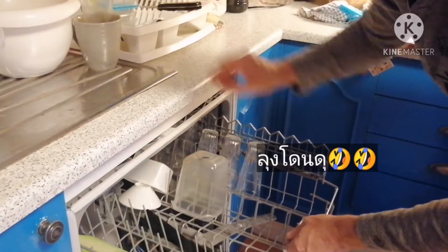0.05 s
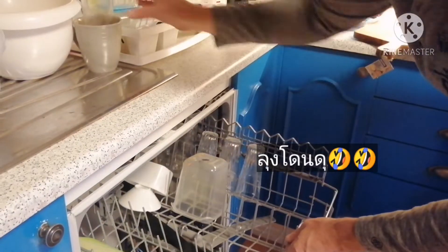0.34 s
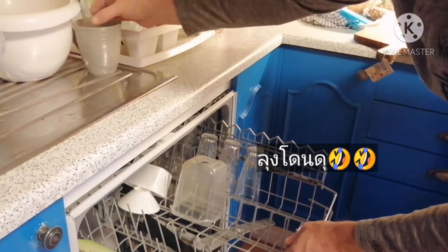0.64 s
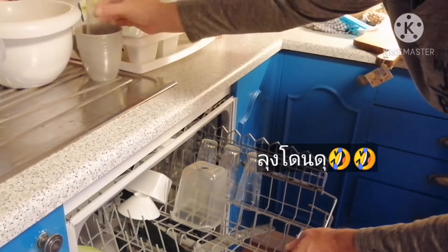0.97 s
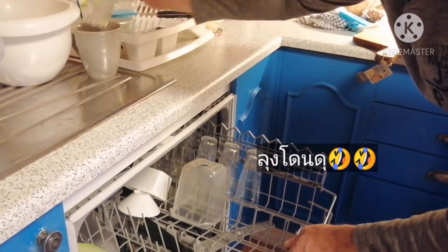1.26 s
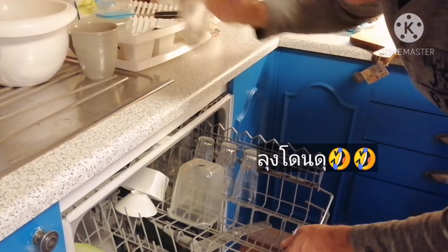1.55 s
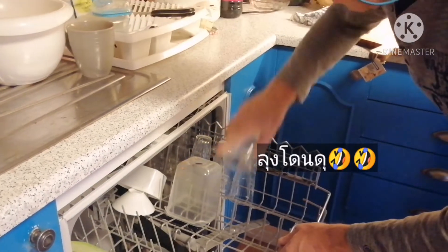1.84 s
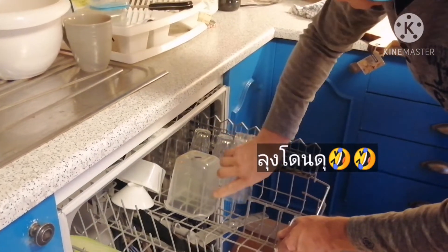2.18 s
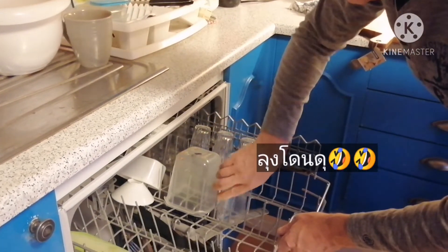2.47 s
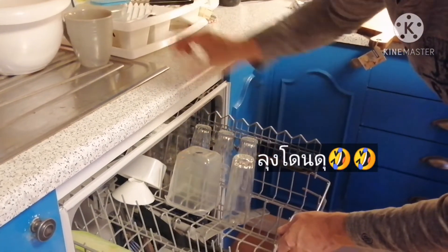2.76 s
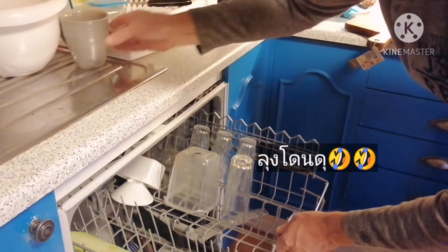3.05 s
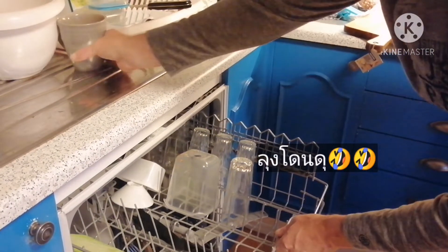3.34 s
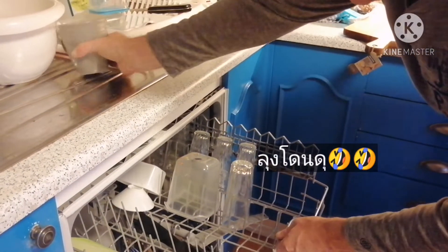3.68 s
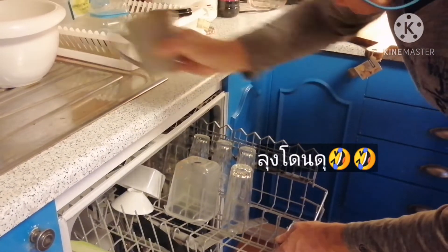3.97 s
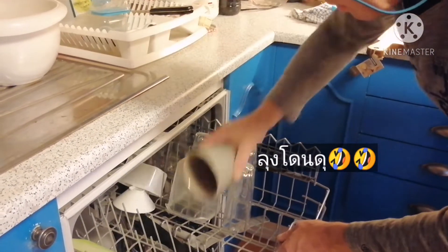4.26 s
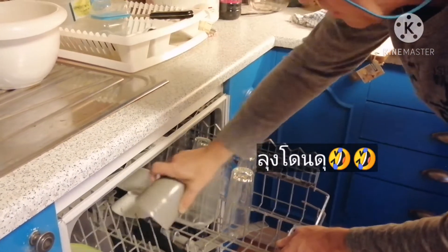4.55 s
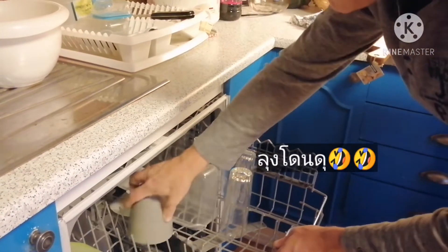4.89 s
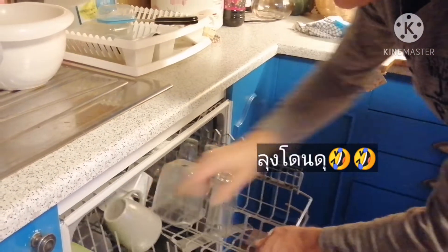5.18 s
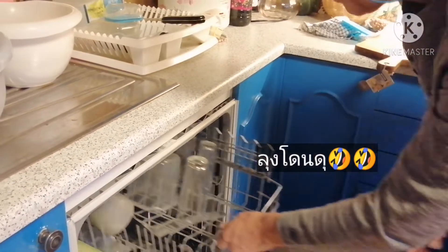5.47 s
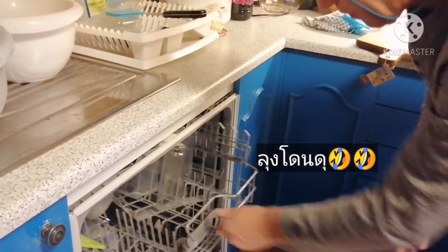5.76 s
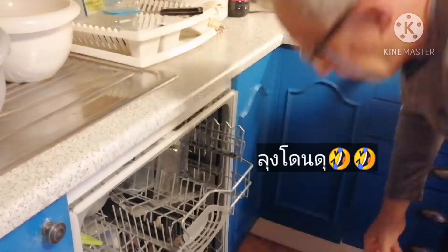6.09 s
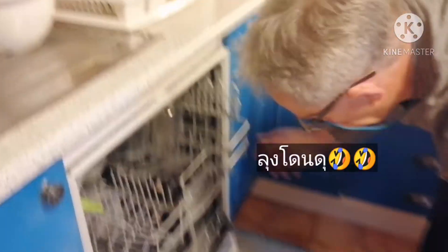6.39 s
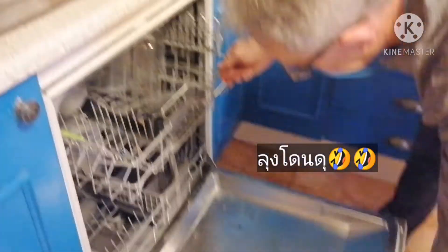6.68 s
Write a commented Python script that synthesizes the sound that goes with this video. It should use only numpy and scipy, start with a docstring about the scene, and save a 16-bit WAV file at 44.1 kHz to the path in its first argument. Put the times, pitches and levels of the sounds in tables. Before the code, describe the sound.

A faint hum fills a small, hard-walled kitchen, and a wire rack gives a slight rattle at the start. Around 1 second a china mug is knocked and rocks, chiming clearly over the low boom of a steel draining board. From 2.3 to 3 seconds drinking glasses clink together and the dishwasher rack rattles. At 3.1 seconds the mug thuds on the board, with softer knocks and light drags until about 3.9. Between 4.7 and 5.3 seconds it clinks into the rack, rubbing against the tines with two brief groans and a tiny squeal. From 5.4 seconds the rack rolls in with three quick clicks, a low rumble, scraping runners and softly shivering glasses, and it clacks against its stop near 5.9. A few faint bumps and tinks follow, and the door clunks at about 6.8. Everything sounds close, with short room echoes.

```python
"""A dishwasher is loaded in a small kitchen. A china mug is knocked and rocks, chiming, on the booming
steel draining board. A tumbler clinks in among the glasses in the wire rack. The mug is dragged off the
board and wedged in beside them, groaning and squealing against the tines. The rack rolls home on scraping
runners, glasses shivering, and hits its stop; last, the door clunks as it is lifted. Hard walls and
cupboards answer the blows, over a faint hum."""
import sys
import numpy as np
from scipy import signal
from scipy.fft import rfft, irfft
from scipy.io import wavfile

SR = 44100
rng = np.random.default_rng(int(sys.argv[2]) if len(sys.argv) > 2 else 0)


def pcm_store(signal):
    """Save signal as 16-bit PCM."""
    levels = np.round(np.clip(np.atleast_2d(signal), -1, 1) * 32767)
    wavfile.write(sys.argv[1], SR, levels.astype(np.int16).T)


N = 301236
T = np.arange(N) / SR
FREQS = np.fft.rfftfreq(N, 1 / SR)


def mug(rim_crack_db=-10, foot_crack_db=0):
    """China chimes when struck at the rim and cracks at the foot; it rings out only when it stands free."""
    # clear modes: f/Hz, t60/s, level/dB struck at the rim, on the wall, at the foot
    modes = [(964, 1.2, -32, -34, -28), (2184, .62, 1, 2.5, -4.5), (2320, .66, -18, -14, 4),
             (900, .09, -16, -11, -19), (1180, .08, -8, -26.5, -20), (2225, .15, -10, -14, -1),
             (2440, .15, -24, -25.5, 0), (2590, .12, -29.5, -23, 0), (2883, .16, -20, -11, -11),
             (2975, .13, -17, -15, -5), (3780, .18, -18, -16, -15), (4797, .38, -24, -11, -17),
             (5610, .1, -24, -25, 1), (5695, .16, -33, -34, -2), (6480, .17, -4, -12.5, -17.5),
             (6400, .14, -9, -25.5, -21.5), (8160, .1, -15, -21, -26), (10650, .1, -17, -18, -22.5),
             (11760, .11, -24, -22, -26.5)]
    # the clink's noisy crack: f/Hz, level/dB
    crack = [(100, -22), (450, -20), (850, 9), (1400, -10.5), (1900, 1), (2600, 4.5), (3700, 2.5),
             (4800, -10), (6600, -7), (9000, -18), (11900, -10.5), (13200, -50.5)]
    # blows: t/s, level/dB, brightness/(dB per octave), place (0 rim, 1 foot), contact damping/(1/s)
    hits = [(.982, -11.5, -1, 0.54, 30.5), (1.027, -20, 4.5, 0.85, 21.5), (1.068, -26.5, 0, 1, 29),
            (1.078, -23.5, -1, 1, 28), (1.104, -23, -1.5, .95, 0), (1.152, -36, 0.5, 0.37, 12.5),
            (3.125, -43, 9, .9, 30), (4.682, -25.5, 3, .018, 33), (4.779, -27, 2, 0.92, 44),
            (5.052, -38, -7, 0.83, 35), (5.199, -28.5, 8, 0.89, 24), (5.207, -26, -4, 0.85, 26)]
    out = np.zeros(N)
    for s, db, bright_db, place, damping in hits:
        ring = vessel(modes, place, damping)
        crack_db = db + between(rim_crack_db, foot_crack_db, place)
        add(out, s, blow(ring, crack, db, crack_db, bright_db, pivot_hz=2800, crack_t60=0.034))
    return out


def glass_tap(db, place, semitones):
    """One tumbler meets another: a short tink at the rim, brighter and longer at the foot."""
    # clear modes: f/Hz, t60/s, level/dB struck at the rim, at the foot
    modes = [(1476, .28, -22, -46), (1897, 0.077, -33, -11.5), (2803, 0.075, -2, -18.5),
             (2913, 0.15, 3.5, -8), (2984, 0.1, 1.5, -14), (3060, 0.074, -12.5, -26),
             (3533, 0.17, -23, -16.5), (5840, 0.14, -16, -9.5), (6460, 0.26, -25.5, -1),
             (6560, .16, -26, -4), (10230, 0.12, -35, 2), (10840, .11, -16.5, -14), (11300, 0.14, -35.5, 0),
             (11900, .15, -47, 1.5)]
    # the clink's noisy crack: f/Hz, level/dB
    crack = [(100, -25), (500, -5), (1900, -7.5), (3000, -3), (4300, -12), (6550, 3), (8400, -9),
             (12200, 2), (13300, -38.5)]
    damping = between(48, 3, place)  # 1/s: fingers choke the rim, wires barely damp the foot
    ring = vessel(modes, place, damping, semitones)
    crack_db = db + between(-15, 0, place)
    bright_db = between(-5, -1.5, place)
    return blow(ring, crack, db, crack_db, bright_db, pivot_hz=2800, crack_t60=.07)


def tumblers():
    """Nearly alike glasses clink together, each at a slightly different pitch."""
    # taps: t/s, level/dB, place (0 rim, 1 foot), detune/semitones
    hits = [(2.334, -37, 0, 0), (2.509, -30, 0.11, 0.11), (2.578, -20.5, 0.52, -0.01),
            (2.654, -20.5, 0.8, 0.07), (2.831, -34, 0.81, -0.14), (2.855, -28, 0.63, 0.12),
            (2.866, -26, 0.72, 0.39), (2.96, -29, 0.33, .7), (5.337, -36, 0.47, 0.53),
            (6.045, -70, .08, 0.85), (6.316, -50.5, 0.52, 0.76), (6.426, -54, 0.42, 0.73)]
    out = np.zeros(N)
    for s, db, place, semitones in hits:
        add(out, s, glass_tap(db, place, semitones))
    return out


def draining_board(edge_boom_db=-9, middle_boom_db=4):
    """The mug knocks on the steel sheet, which booms most in the middle, and is dragged off in two pulls."""
    # modes of the steel sheet, plus the high ring of the mug knocking on it: f/Hz, t60/s, level/dB
    modes = [(71.07, 0.17, -11.5), (123.9, 0.17, -4), (141.6, .14, 4.5), (190.2, 0.13, -9.5),
             (253, 0.053, -11.5), (720, 0.044, -13.5), (814, 0.11, -6.5), (2745, .04, -13),
             (4850, .3, -25.5)]
    # the knock's noisy crack: f/Hz, level/dB
    crack = [(45, -25.5), (130, 2.5), (300, -1), (900, -5), (1500, -9), (2600, -2), (4300, -18.5),
             (7000, -26), (12000, -32.5), (15000, -50)]
    # knocks: t/s, level/dB, brightness/(dB per octave), place (0 edge, 1 middle)
    hits = [(0.822, -36, -5, 0.42), (0.875, -36, -0.5, 0.16), (1.005, -25.5, -5, 0.52),
            (1.051, -27, 1.5, 0.12), (1.098, -27.5, -2, 0.63), (1.179, -25, 0, 0.33),
            (3.125, -17.5, 0, 0.56), (3.371, -27, 1, 0.26), (3.384, -31, 0, 0.28),
            (3.662, -33.5, -5.5, 0.7), (3.706, -41, -9, 0.93), (3.905, -42.5, -2, 0)]
    # pulls: t/s, length/s, level/dB
    pulls = [(3.595, 0.087, -48.5), (3.73, 0.037, -42.5)]
    # china dragging on steel: f/Hz, level/dB
    drag_colour = [(200, -41), (800, 8.5), (1500, 6.5), (3700, 4.5), (5000, -1), (12000, -9.5),
                   (15000, -24)]
    boom_db = [between(edge_boom_db, middle_boom_db, hit[-1]) for hit in hits]
    thuds = knocks([hit[:-1] for hit in hits], modes, crack, crack_t60=0.09, ring_db=boom_db)
    return thuds + rub(pulls, drag_colour, slips_per_s=2500, spread_db=4.0)


def wire_rack():
    """The loaded rack rattles when jolted; the mug rubs in between its tines, then slips home."""
    # modes of the loaded rack: f/Hz, t60/s, level/dB
    modes = [(235.3, 2.5, -14), (315.3, 0.51, 1), (523, 0.27, -1.5), (663, 0.12, 3), (788, 0.18, 0)]
    # the jolt's noisy crack: f/Hz, level/dB
    crack = [(40, 1), (130, 12.5), (550, 16.5), (1200, 2), (2500, 1.5), (4200, -14), (6000, -19),
             (8500, -35), (12000, -38), (15000, -84)]
    # jolts: t/s, level/dB, brightness/(dB per octave)
    jolts = [(.002, -37.5, 1.5), (2.569, -32.5, 8.5), (2.579, -20.5, 6), (2.612, -21, 4.5),
             (4.761, -38.5, 2.5), (4.781, -33, 2.5), (4.942, -35.5, 5.5), (5.021, -31.5, 7.5),
             (5.056, -29, 7), (5.208, -23, 3.5)]
    # pushes on the mug: t/s, length/s, level/dB
    pushes = [(4.765, 0.388, -45.5), (5.2, 0.074, -42)]
    # china rubbing on tines: f/Hz, level/dB
    wedge_colour = [(35, -44), (60, 0), (302, 1), (418, -0.5), (564, -17), (663, 1.5), (875, -5),
                    (2150, -9.5), (4730, -11), (5680, -10), (15000, -32)]
    rattle = knocks(jolts, modes, crack, crack_t60=0.045, ring_db=-15.5)
    return rattle + rub(pushes, wedge_colour, slips_per_s=220, spread_db=2.5)


def tine_groans(jitter=0.095, overtone_db=-9):
    """A tine sticks and slips on the china: brief groans, gliding and unsteady in pitch."""
    # groans: t/s, length/s, starting slip rate/Hz, final slip rate/Hz, level/dB
    groans = [(4.889, 0.054, 360, 450, -36.5), (4.941, 0.065, 700, 670, -39.5)]
    out = np.zeros(N)
    for s, length, start_hz, end_hz, db in groans:
        size = int(length * SR)
        hz = np.linspace(start_hz, end_hz, size) * (1 + jitter * walk(273)[:size])
        phase = 2 * np.pi * np.cumsum(hz) / SR
        tone = np.sin(phase) + undb(overtone_db) * np.sin(2 * phase)
        add(out, s, undb(db) * np.hanning(size) * tone)
    return out


def mug_squeal():
    """Sliding down a tine keeps one high mode of the china singing."""
    # slide: t/s, length/s, level/dB
    slide = [(5.15, .05, -48.5)]
    return sing(rng.standard_normal(N), resonance(hz=5600, width_hz=40)) * strokes(slide)


def tub_and_door():
    """Bumps make the tub boom; the lifted door shares its body but mostly clunks."""
    # modes of tub and door: f/Hz, t60/s, level/dB
    modes = [(79.3, 0.33, -11.5), (137, 0.027, 9), (189.4, 0.094, -6), (226, 0.11, -11), (293, 0.15, -11)]
    # the bump's noisy crack: f/Hz, level/dB
    crack = [(40, -32.5), (120, -3.5), (300, 5.5), (600, -6), (1500, -12.5), (2800, -6.5), (4500, -38),
             (14000, -60)]
    # bumps on the tub: t/s, level/dB
    bumps = [(2.597, -38.5), (5.626, -48.5), (5.871, -40.5), (6.58, -52.5), (6.674, -53)]
    # door clunks: t/s, level/dB, brightness/(dB per octave)
    clunks = [(6.777, -36.5, -8), (6.794, -35.5, -7.5), (6.817, -30.5, 0.5)]
    dull_bumps = [(s, db, -1.0) for s, db in bumps]
    booms = knocks(dull_bumps, modes, crack, crack_t60=0.053, ring_db=13.5)
    return booms + knocks(clunks, modes, crack, crack_t60=0.11, ring_db=-17.5)


def rolling(chatter_db=-4):
    """The wheels rumble on their runners; the first shove shakes the loose wires."""
    # a shove, then a longer push: t/s, length/s, level/dB
    pushes = [(5.37, 0.12, -45), (5.53, 0.288, -49.5)]
    # wheel rumble: f/Hz, level/dB
    rumble_colour = [(25, -3), (70, -0.5), (140, -0.5), (300, -6.5), (600, -18.5), (2500, -30), (5000, -37),
                     (15000, -63)]
    # wire chatter: f/Hz, level/dB
    chatter_colour = [(300, 3.5), (1000, 3), (1600, 5.5), (2900, 2), (4300, -4), (6000, -33), (14000, -51)]
    wheels = rub(pushes, rumble_colour, slips_per_s=790, spread_db=3.5)
    wires = rub(pushes[:1], chatter_colour, slips_per_s=134, spread_db=4.5)
    return wheels + undb(chatter_db) * wires


def end_stop():
    """The rack hits its end stop with a clack."""
    # spectrum of the clack: f/Hz, level/dB
    spectrum = [(60, 4.5), (250, 12.5), (600, -11.5), (1200, 1), (1800, -7), (2600, 6.5), (3400, -2),
                (4500, -19), (12000, -45)]
    return clack(spectrum, s=5.863, db=-33, t60=0.071)


def wheel_clicks():
    """One sharp, dry pulse for each runner joint that a wheel crosses."""
    # joints: t/s, peak level/dB
    joints = [(5.383, -31), (5.419, -30), (5.437, -27.5)]
    # spectrum of a click: f/Hz, level/dB
    spectrum = [(60, -18), (300, 15), (1500, -1), (4400, -4), (5200, -22), (14000, -44)]
    pulse = colour(signal.unit_impulse(SR), spectrum)
    out = np.zeros(N)
    for s, db in joints:
        add(out, s, undb(db) * pulse / np.abs(pulse).max())
    return out


def glass_shiver(place=0.4, spread_db=3):
    """The rolling rack sets off many tiny, random taps among the glasses."""
    # spell of shivering: t/s, length/s, tap rate/(1/s), level/dB
    spells = [(5.39, .45, 50, -58.5)]
    # one per tumbler: detune/semitones
    detunes = [-0.64, 0.594, .9]
    out = np.zeros(N)
    for semitones in detunes:
        chance = rng.random(N)
        sizes = undb(spread_db * rng.standard_normal(N))
        touches = np.zeros(N)
        for s, length, rate, db in spells:
            moving = (T > s) & (T < s + length)
            touches += undb(db) * moving * (chance < rate / SR / len(detunes))
        out += signal.fftconvolve(touches * sizes, glass_tap(0, place, semitones))[:N]
    return out


def runners(uneven_db=2):
    """Metal scrapes unevenly on metal and sings in the runners as the rack goes in."""
    # runner resonances: f/Hz, width/Hz, level/dB
    modes = [(2500, 260, 0.5), (2980, 200, 0), (3800, 420, -9), (9040, 1200, -12.5)]
    # scrapes: t/s, length/s, level/dB
    scrapes = [(5.57, 0.14, -77), (5.7, 0.16, -61.5)]
    body = sum(undb(db) * resonance(hz, width_hz) for hz, width_hz, db in modes)
    return sing(rng.standard_normal(N), body) * undb(uneven_db * walk(66)) * strokes(scrapes)


def ticks():
    """Small, dry ticks close by."""
    # ticks: t/s, level/dB, t60/s
    events = [(2.522, -49, 0.21), (4.359, -50, 0.073)]
    # spectrum of a tick: f/Hz, level/dB
    spectrum = [(400, -22), (950, 12.5), (1700, -34), (2900, 5), (4000, -16), (5200, -19), (8000, -43)]
    return sum(clack(spectrum, s, db, t60) for s, db, t60 in events)


def room_tone(air_db=-63, drift_db=0.77):
    """A soft bed of kitchen air with a low and a high wavering hum."""
    # spectrum of the air: f/Hz, level/dB
    air = [(15, -33), (25, -9), (59, -4.5), (118, -15), (231, -6), (278, -19), (318, 0), (383, -15.5),
           (427, -11), (475, -15.5), (2070, -29.5), (3010, -29.5), (3730, -33), (15000, -48)]
    # hums: f/Hz, width/Hz, level/dB
    hums = [(345.2, 18, -69.5), (3010, 38, -81)]
    out = undb(air_db + drift_db * walk(0.43)) * unit(colour(diffuse(N), air))
    for hz, width_hz, db in hums:
        out += undb(db) * sing(diffuse(N), resonance(hz, width_hz))
    return out


def kitchen(dry, near_db, far_db, far_t60, treble_t60, near_t60=.14, treble_hz=4000):
    """Direct sound, quick echoes from worktop and cupboards, then the room's tail, shorter in the treble."""
    t = T[:SR]
    near = undb(near_db) * diffuse(SR) / np.sqrt(SR) * fade(t, near_t60) * np.minimum(t / 0.00098, 1)
    near[:, 0] += 1  # the direct sound
    # flatten the quick echoes: they smear a sound in time but favour no pitch
    for _ in range(4):
        paths = rfft(near)
        near = irfft(paths / np.abs(paths) ** .5, SR) * np.exp(-(t / near_t60) ** 4)
    noise = diffuse(SR) / np.sqrt(SR)
    low = signal.sosfilt(signal.butter(2, treble_hz, fs=SR, output="sos"), noise)
    high = signal.sosfilt(signal.butter(2, treble_hz, "high", fs=SR, output="sos"), noise)
    tail = (low * fade(t, far_t60) - high * fade(t, treble_t60)) * np.minimum(t / 0.018, 1)
    response = near + undb(far_db) * tail
    response /= np.sqrt(np.mean(np.sum(response ** 2, axis=1)))
    return signal.fftconvolve(dry[None], response, axes=1)[:, :N]


def vessel(modes, place, damping, semitones=0):
    """A vessel's modes change in level from rim to foot; contact shortens them and pulls them off pitch."""
    hz, t60, *levels = np.transpose(modes)
    db = [np.interp(place, np.linspace(0, 1, len(row)), row) for row in np.transpose(levels)]
    held_t60 = 1 / (1 / t60 + damping / np.log(1000))
    pull = 1 + 1.3e-4 * damping * rng.standard_normal(len(hz))
    return np.transpose([hz * pull * 2 ** (semitones / 12), held_t60, db])


def blow(modes, crack, ring_db, crack_db, bright_db, pivot_hz, crack_t60):
    """Clear modes ring on after a short, noisy crack; harder contact tilts both to the treble."""
    t = T[:SR]
    hz, t60, db = (column[:, None] for column in np.transpose(modes))
    tilt = lambda f: bright_db * np.log2(np.maximum(f, 300) / pivot_hz)  # dB, flat in the bass
    polarity = rng.choice([-1, 1], hz.shape)
    ring = undb(ring_db + db + tilt(hz)) * fade(t, t60) * np.sin(2 * np.pi * hz * t) * polarity
    ring *= 1 - np.exp(-2 * hz * t)  # each mode swells within a cycle
    burst = rng.standard_normal(SR) * fade(t, crack_t60)
    burst = colour(burst, [(f, level + tilt(f)) for f, level in crack])
    burst /= np.sqrt(np.mean(np.abs(gains(crack, SR)) ** 2))
    return ring.sum(axis=0) + undb(crack_db) * burst


def knocks(hits, modes, crack, crack_t60, ring_db):
    """Blows on a large, loose body; ring_db is its boom over the crack, for all blows or for each."""
    out = np.zeros(N)
    for (s, db, bright_db), boom_db in zip(hits, np.broadcast_to(ring_db, len(hits))):
        add(out, s, blow(modes, crack, db + boom_db, db, bright_db, pivot_hz=566, crack_t60=crack_t60))
    return out


def clack(spectrum, s, db, t60):
    """A single contact with no clear ring."""
    out = np.zeros(N)
    add(out, s, undb(db) * unit(colour(rng.standard_normal(SR), spectrum)) * fade(T[:SR], t60))
    return out


def rub(rows, spectrum, slips_per_s, spread_db):
    """Friction: a dense train of tiny slips of uneven size."""
    slips = (rng.random(N) < slips_per_s / SR) * rng.choice([-1, 1], N)
    sizes = undb(spread_db * np.minimum(rng.exponential(size=N), 4))
    return unit(colour(slips * sizes, spectrum)) * strokes(rows)


def strokes(rows, attack_s=0.0099, release_t60=0.15):
    """Friction envelope: each stroke builds up, holds and dies away."""
    out = np.zeros(N)
    for s, length, db in rows:
        attack = np.clip((T - s) / attack_s, 0, 1)
        release = fade(np.maximum(T - s - length, 0), release_t60)
        out = np.maximum(out, undb(db) * attack * release)
    return out


def placed(x, pan_db, lead_ms):
    """Pan a source: the left side is pan_db louder and lead_ms earlier than the right."""
    left = np.interp(T + lead_ms / 1000, T, x[0])
    return np.array([left * undb(pan_db / 2), x[1] * undb(-pan_db / 2)])


def diffuse(size, apart_hz=1300, least_share=0.2):
    """Stereo noise from all around: narrow in the bass, wide in the treble."""
    mid, side = rfft(rng.standard_normal((2, size)))
    hz = np.fft.rfftfreq(size, 1 / SR)
    share = np.maximum(hz / np.hypot(hz, apart_hz), least_share)
    return irfft(np.array([mid + share * side, mid - share * side]) / np.hypot(1, share), size)


def resonance(hz, width_hz):
    """Gain curve of one resonant peak."""
    return 1 / (1 + (2 * (FREQS - hz) / width_hz) ** 2)


def sing(noise, body):
    """Noise through a body's resonances, at rms 1."""
    return unit(irfft(rfft(noise) * body, N))


def gains(points, size):
    """Minimum-phase response for (f/Hz, level/dB) points: nothing sounds before its cause."""
    hz, db = np.transpose(points)
    log_freqs = np.log(np.fft.rfftfreq(size, 1 / SR) + 1)
    log_gain = np.log(undb(np.interp(log_freqs, np.log(hz), db)))
    cepstrum = irfft(log_gain, size)[:size // 2]
    cepstrum[1:] *= 2
    return np.exp(rfft(cepstrum, size))


def colour(x, points):
    """Equalise a sound along (f/Hz, level/dB) points."""
    size = x.shape[-1]
    return irfft(rfft(x) * gains(points, size), size)


def fade(t, t60):
    """Exponential decay, 60 dB in t60 seconds."""
    return np.exp(-np.log(1000) * t / t60)


def walk(rate):
    """A random wander of spread near 1, with rate turning points a second."""
    knots = rng.standard_normal(400)
    return np.interp(T * rate, np.arange(len(knots)), knots, period=len(knots))


def between(first, last, place):
    """Blend from first (place 0) to last (place 1)."""
    return first + np.clip(place, 0, 1) * (last - first)


def add(track, s, sound):
    """Mix a sound into a track at time s."""
    start = max(int(s * SR), 0)
    track[start:start + len(sound)] += sound[:N - start]


def undb(db):
    """Decibels to gain."""
    return 10 ** (np.asarray(db) / 20)


def unit(x):
    """Scale to rms 1."""
    return x / np.sqrt(np.mean(x ** 2))


def scene():
    """Crockery, board and machine sound into the kitchen, each from its own place; ticks and clicks stay dry."""
    chime_room = dict(near_db=27, far_db=14.5, far_t60=0.38, treble_t60=0.27)
    thud_room = dict(near_db=28.5, far_db=10.5, far_t60=0.47, treble_t60=0.29)
    machine = wire_rack() + tine_groans() + tub_and_door() + rolling() + runners() + end_stop()
    china = placed(kitchen(mug() + mug_squeal(), **chime_room), pan_db=-.5, lead_ms=0.11)
    glass = placed(kitchen(tumblers() + glass_shiver(), **chime_room), pan_db=3.7, lead_ms=0.053)
    board = placed(kitchen(draining_board(), **thud_room), pan_db=4.1, lead_ms=.22)
    dishwasher = placed(kitchen(machine, **thud_room), pan_db=0.74, lead_ms=0.055)
    return china + glass + board + dishwasher + ticks() + wheel_clicks() + room_tone()


def record(dry, low_hz=32, top_hz=15200):
    """Each of two microphone ports colours the sound its own way; the deepest bass and the top are cut."""
    # port balance: f/Hz, left minus right/dB
    balance = [(60, -4.5), (140, 0), (280, -5), (600, -2.5), (1200, -5), (2300, -5), (5000, -5.5),
               (8500, -3.5), (12000, 6.5)]
    left = colour(dry[0], [(hz, db / 2) for hz, db in balance])
    right = colour(dry[1], [(hz, -db / 2) for hz, db in balance])
    ports = signal.sosfilt(signal.butter(2, low_hz, "high", fs=SR, output="sos"), [left, right])
    return signal.sosfilt(signal.ellip(8, .2, 70, top_hz, fs=SR, output="sos"), ports)


dry = scene()
out = record(dry)
pcm_store(out)
```